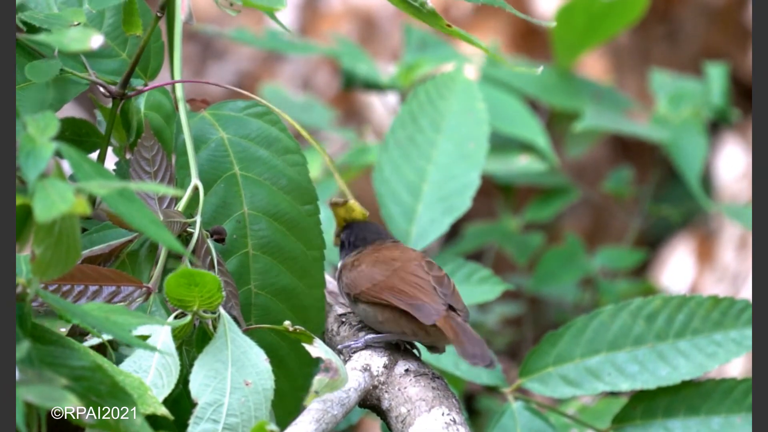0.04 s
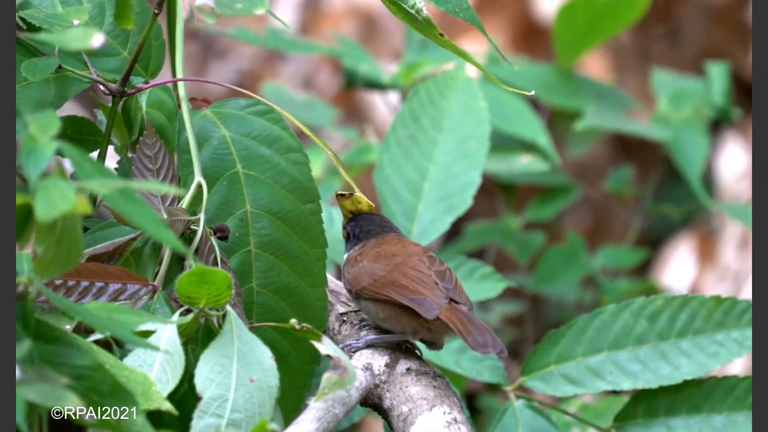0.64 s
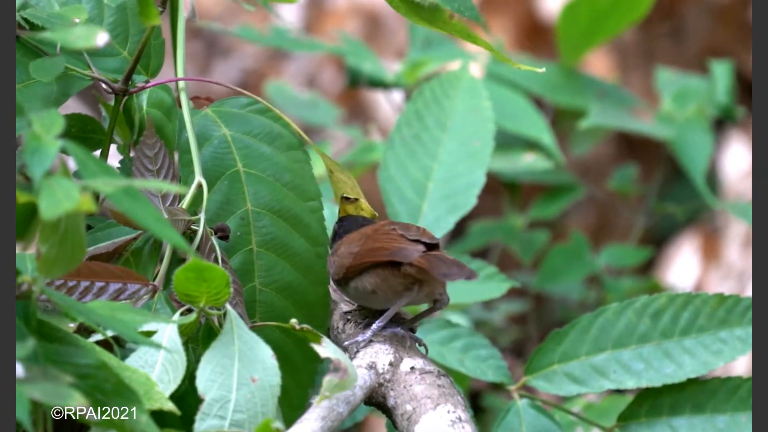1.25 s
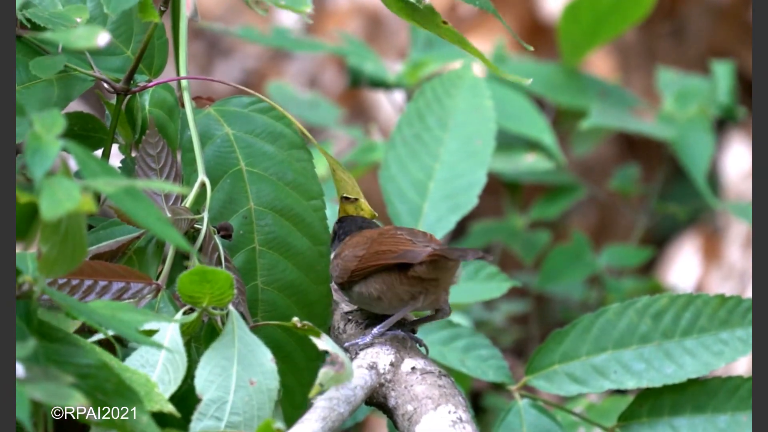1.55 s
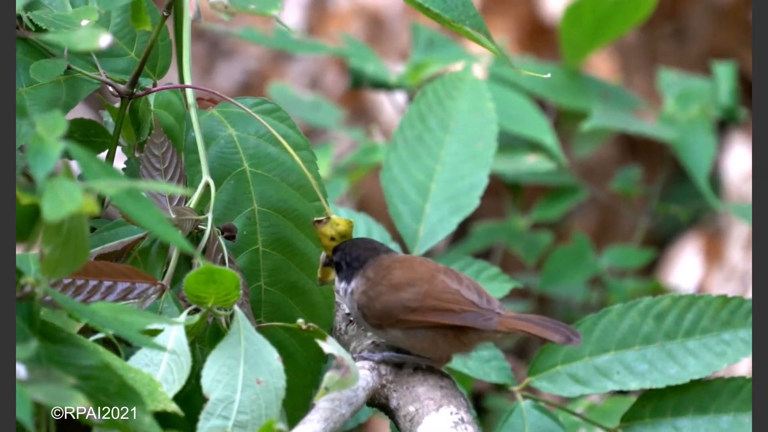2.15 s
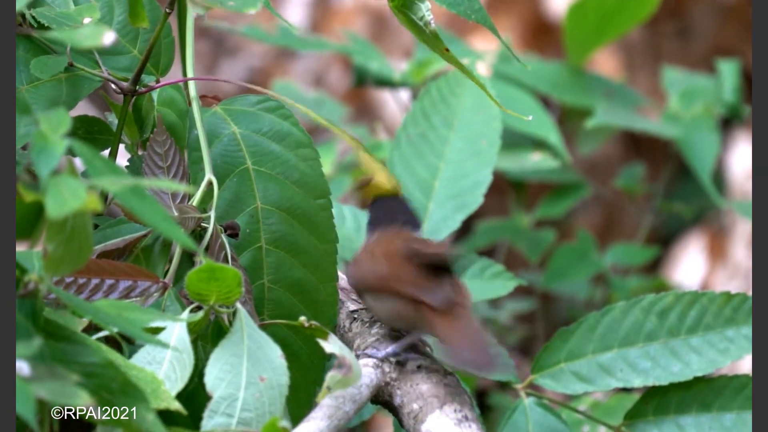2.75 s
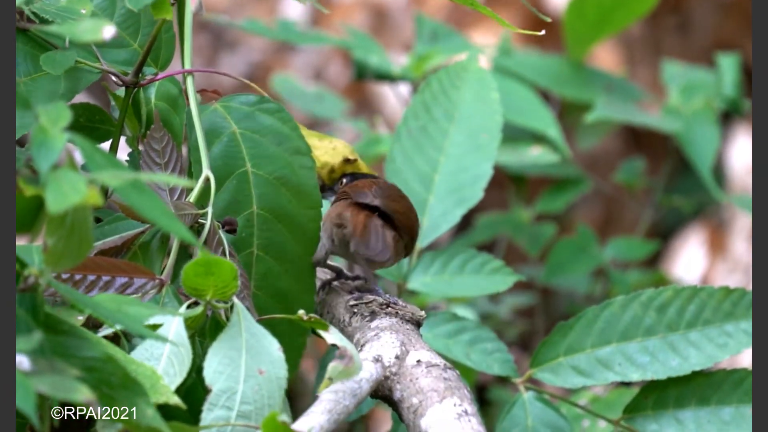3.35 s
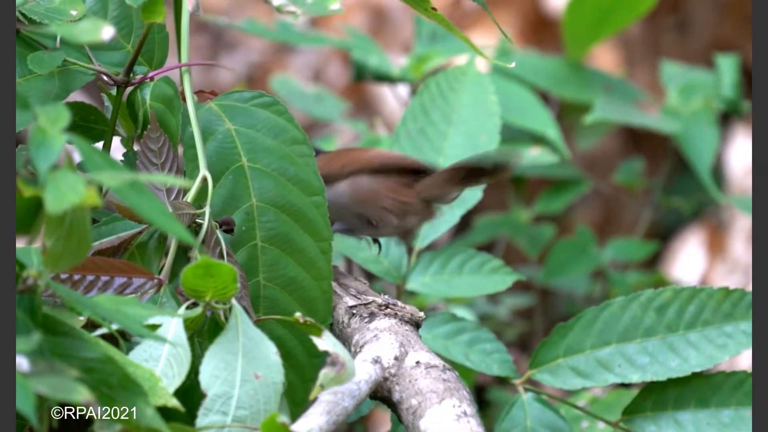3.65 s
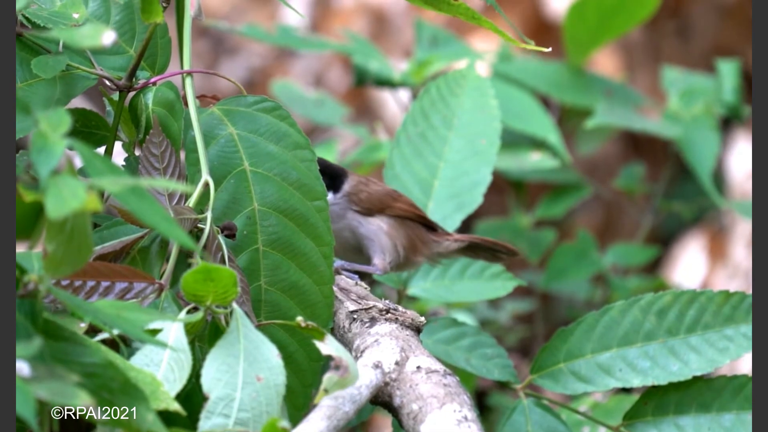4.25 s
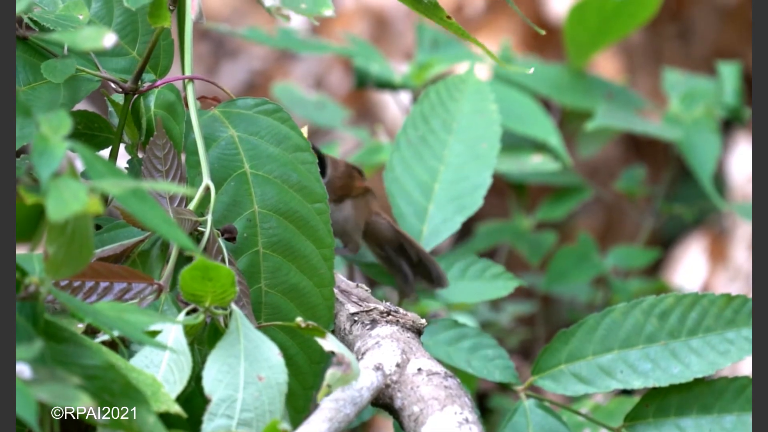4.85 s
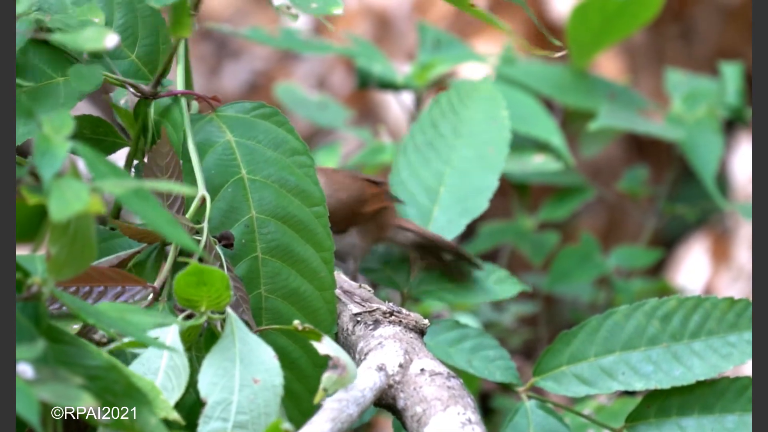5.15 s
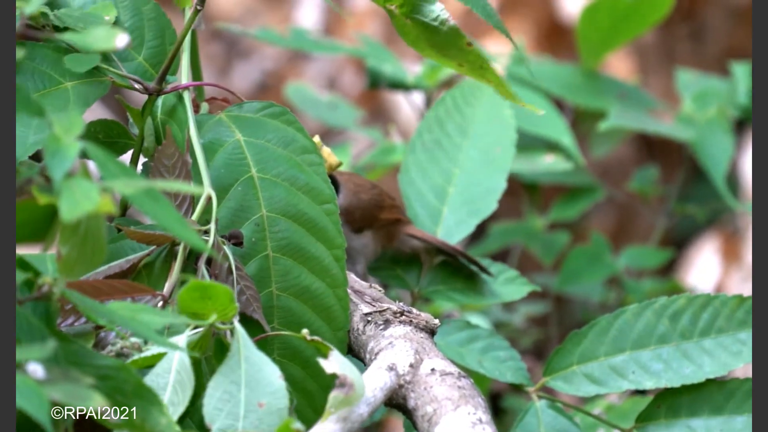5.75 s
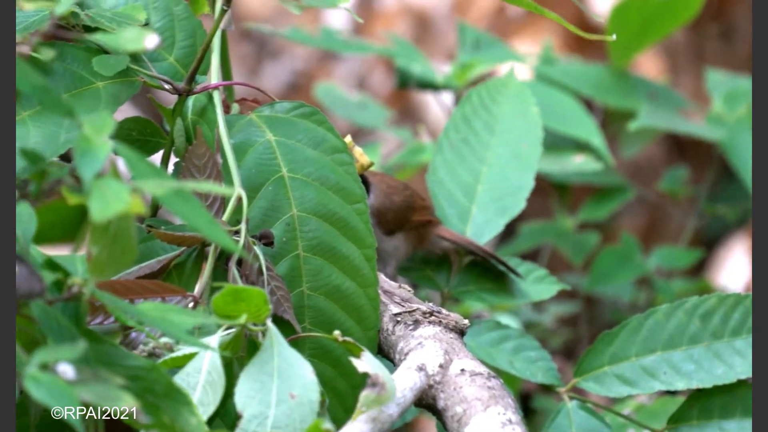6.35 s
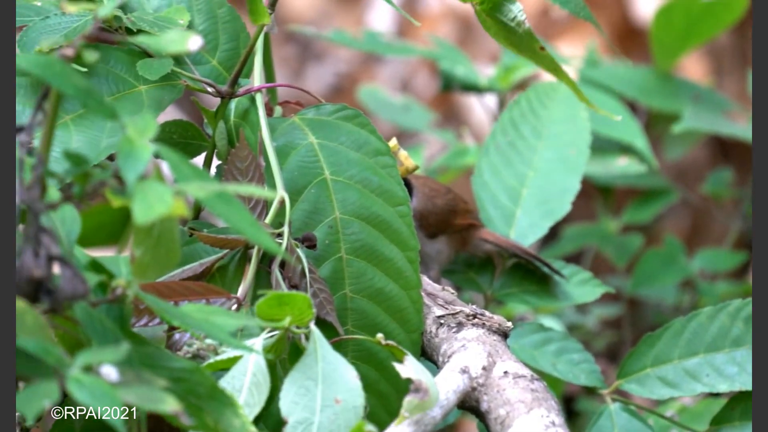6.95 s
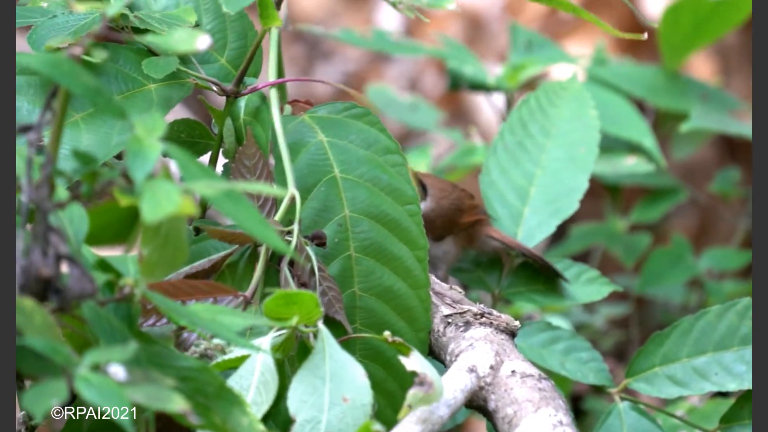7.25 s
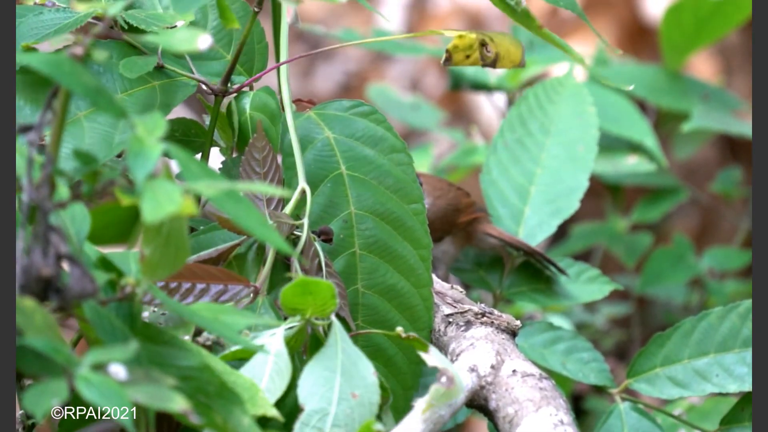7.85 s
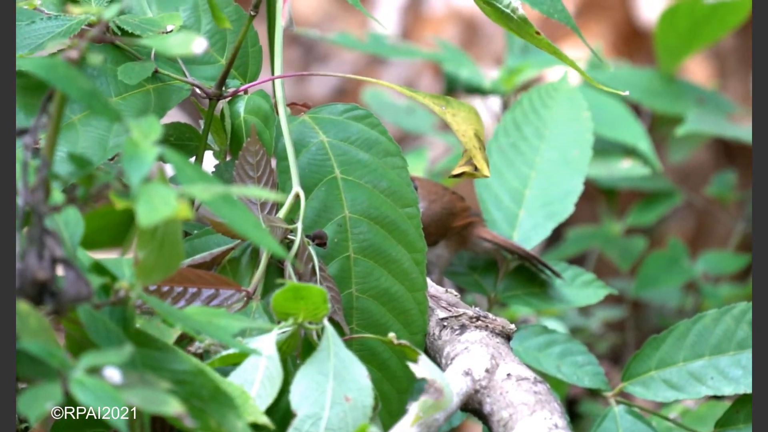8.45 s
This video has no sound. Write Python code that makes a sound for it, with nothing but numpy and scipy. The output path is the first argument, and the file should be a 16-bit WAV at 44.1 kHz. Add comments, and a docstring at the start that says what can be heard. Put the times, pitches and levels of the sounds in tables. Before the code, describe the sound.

Birds whistle sharp chips and two-note chirps among foliage, while others hoot, trill and twitter over a faint forest hush.

```python
"""Dense forest. Over a faint hush, a babbler's chirp rings out among leaves and trunks.
A farther bird starts a low warbled trill, back about every 1.4 s, and an insect ticks throughout.
Babblers whistle sharp rising chips, small birds twitter high up, and another bird gives five
hollow hoots; wings rustle now and then. From about 2 s the babblers add slower two-note chirps,
smeared like their chips by scattering in the thicket."""
import sys
import numpy as np
from scipy import signal
from scipy.fft import rfft, irfft
from scipy.io import wavfile

SR = 44100
rng = np.random.default_rng(int(sys.argv[2]) if len(sys.argv) > 2 else 0)


def unload_wav(signal):
    """Save mono or channel-first audio to the path in sys.argv[1] as 16-bit WAV at rate SR, clipped to [-1, 1]."""
    wavfile.write(
        sys.argv[1],
        SR,
        np.round(np.clip(np.atleast_2d(signal).T, -1, 1) * 32767).astype(np.int16),
    )


N = 375291


def from_db(db):
    """Decibels to gain."""
    return 10 ** (np.asarray(db) / 20)


def add(track, s, sound):
    """Mix a sound into a track at time s."""
    at = max(round(s * SR), 0)
    track[at:at + len(sound)] += sound[:max(N - at, 0)]


def times(length_s):
    """Sample times in seconds."""
    return np.arange(int(length_s * SR)) / SR


def envelope(t, attack_s, release_s):
    """Quarter-sine attack, hold, quarter-sine release."""
    attack = np.sin(np.pi / 2 * np.clip(t / attack_s, 0, 1))
    release = np.sin(np.pi / 2 * np.clip((t[-1] - t) / release_s, 0, 1))
    return attack * release


def whistle(hz, db, octave_db=-45):
    """The syrinx gives a near sine with a weak octave and soft ends."""
    phase = 2 * np.pi * np.cumsum(hz) / SR
    tone = np.sin(phase) + from_db(octave_db) * np.sin(2 * phase)
    return np.sqrt(2) * from_db(db) * signal.windows.tukey(len(hz), .1) * tone


def slur(length_s, start_hz, end_hz, db, quaver_hz=0):
    """A glide that swells and fades, with an optional quick quaver in pitch."""
    u = np.linspace(0, 1, int(length_s * SR))
    quaver = quaver_hz * np.sin(2 * np.pi * rng.uniform(50, 90) * length_s * u)
    return whistle(start_hz + (end_hz - start_hz) * u + quaver, db - 10 * (2 * u - 1) ** 2)


def echoes(x, trunks, trunk_db, leaves, leaf_db):
    """Convolve with trunk and leaf responses, each scaled by its energy."""
    response = from_db(trunk_db) * trunks / np.linalg.norm(trunks)
    response += from_db(leaf_db) * leaves / np.linalg.norm(leaves)
    return signal.fftconvolve(x, response)[:N]


def forest(x, direct, trunk_db, trunk_t60_s, leaf_db, leaf_t60_s):
    """Direct sound, separate echoes from near trunks, then a dense tail from the foliage."""
    t = times(1.3)
    trunks = rng.standard_normal(len(t)) * (rng.random(len(t)) < 900 / SR)   # 900 echoes/s
    trunks *= from_db(-60 * t / trunk_t60_s) * (t > .003)
    leaves = rng.standard_normal(len(t)) * from_db(-60 * t / leaf_t60_s) * (1 - np.exp(-t / .02))
    return direct * x + echoes(x, trunks, trunk_db, leaves, leaf_db)


# Hush spectrum: (frequency [Hz], relative density [dB])
AIR_SPECTRUM = [(22, -19), (40, -5.5), (62, 0.5), (110, 1.5), (165, -4.5), (275, 1), (420, -5.5),
                (1000, -7.5), (3200, -18), (5200, -17.5), (7500, -11), (9700, -26.5), (12500, -21.5),
                (15700, -19.5)]


def air(level_db=-71):
    """Faint, even hush of the forest."""
    hz, db = np.transpose(AIR_SPECTRUM)
    colour = from_db(np.interp(np.log(np.fft.rfftfreq(N, 1 / SR) + 1), np.log(hz), db))
    hush = irfft(rfft(rng.standard_normal(N)) * colour, N)
    return from_db(level_db) * hush / hush.std()


# Thicket decay: (band centre [Hz], T60 [s])
THICKET_DECAY = [(1700, .36), (2300, 0.3), (3000, 0.51), (4000, 0.58), (5200, 0.56), (8000, 0.77)]


def thicket(x, direct=.42, trunk_db=-6.5, trunk_t60_s=.24, leaf_db=-.5, leaf_build_s=.03):
    """The babblers' cover: trunks return separate echoes, leaves scatter high notes longest."""
    t = times(1.2)
    trunks = rng.choice([-1, 1], len(t)) * (rng.random(len(t)) < 500 / SR)   # 500 echoes/s
    trunks = trunks * from_db(-60 * t / trunk_t60_s) * (t > .004)
    white, hz = rfft(rng.standard_normal(len(t))), np.fft.rfftfreq(len(t), 1 / SR)
    centres_hz, t60s = np.transpose(THICKET_DECAY)
    leaves = np.zeros(len(t))
    for one_band, t60_s in zip(np.eye(len(centres_hz)), t60s):
        band_noise = irfft(white * np.interp(hz, centres_hz, one_band), len(t))
        leaves += band_noise * from_db(-60 * t / t60_s)
    leaves *= 1 - np.exp(-t / leaf_build_s)
    return direct * x + echoes(x, trunks, trunk_db, leaves, leaf_db)


def upsweep(length_s, top_hz, db, bend=1.8, tilt_db_per_octave=0):
    """A rough rising whistle, weak below the throat resonance and flaring as it passes through."""
    start_hz, crest_share = 1458, .92
    throat_hz, throat_width_hz = 2289, 80
    t = times(length_s)
    hz = top_hz - (top_hz - start_hz) * np.abs(1 - t / length_s / crest_share) ** bend   # 2: an arch
    octaves = np.log2(hz / throat_hz)
    throat_db = 6 * np.exp(-((hz - throat_hz) / throat_width_hz) ** 2) + 21 * np.minimum(octaves, 0)
    tilt_db = tilt_db_per_octave * np.maximum(octaves - .5, -.5)
    flutter_db = 3.5 * np.interp(t * 400, np.arange(100), rng.standard_normal(100))   # 400 points/s
    tone = whistle(hz, db + throat_db + tilt_db + flutter_db, octave_db=-35)
    return tone * envelope(t, attack_s=.013, release_s=.0096)


def second_note(low_hz, db, length_s=.035, dip_share=.2, fade_db_per_s=167.5):
    """A chirp's short closing note dips, then curls upward as it fades."""
    t = times(length_s)
    curl = np.abs((t / length_s - dip_share) / (1 - dip_share)) ** 1.4
    level_db = db + fade_db_per_s * (length_s / 2 - t)
    tone = whistle(low_hz * (1 + .27 * curl), level_db, octave_db=-41.5)
    return tone * envelope(t, attack_s=.008, release_s=.01)


# Chirp tails: (time [s], call age [s], top pitch [Hz], sweep level [dB],
# second-note pitch [Hz], second-note level [dB])
CHIRP_TAILS = [(0, 0.27, 5300, -35.5, 3590, -48), (3.243, 0.23, 4805, -32, 2886, -27.5)]


def chirp_tails(sweep_s=.064, second_delay_s=.12):
    """The ring of a chirp in the thicket, setting in abruptly without the chirp itself."""
    out = np.zeros(N)
    for s, age_s, top_hz, sweep_db, second_hz, second_db in CHIRP_TAILS:
        call = np.zeros(N)
        add(call, 0, upsweep(sweep_s, top_hz, sweep_db))
        add(call, second_delay_s, second_note(second_hz, second_db))
        ring = thicket(call)[int(age_s * SR):]
        t = np.arange(len(ring)) / SR
        add(out, s, ring * envelope(t, attack_s=.004, release_s=.004) ** 2)
    return out


# Trills: (time [s], length [s], pitch [Hz], level [dB], cut at warble crests [dB])
WARBLED_TRILLS = [(0.017, 0.22, 1085, -39.5, -2.5), (1.466, 0.23, 1082, -35.5, -1.5),
                  (2.972, 0.15, 1057, -40.5, -8.5), (3.79, 0.24, 1105, -40, 3.5),
                  (5.253, 0.23, 1094, -39.5, 8.5), (6.649, 0.23, 1101, -35.5, 13.5),
                  (8.048, .245, 1101, -32.5, 1.5)]
# Low slurs: (time [s], length [s], start pitch [Hz], end pitch [Hz], level [dB])
LOW_SLURS = [(3.122, 0.091, 1312, 1084, -47), (6.475, 0.054, 1047, 863, -56.5),
             (7.873, 0.043, 1055, 883, -59.5)]


def triller(warble_hz=24.4, warbling_s=.182, settle_s=.039, drop_s=.018, swell_db_per_s=29):
    """Trills drop in from above, warble about four times as they swell, then settle; a few slurs."""
    out = np.zeros(N)
    for s, length_s, hz, db, cut_db in WARBLED_TRILLS:
        t = times(length_s)
        warble = np.cos(2 * np.pi * warble_hz * t) * np.clip((warbling_s - t) / settle_s, 0, 1)
        swings = 1 + .2 * rng.standard_normal(8)   # warbles vary in width
        depth = .075 * np.interp(t * warble_hz, np.arange(len(swings)), swings)
        drop = .16 * np.exp(-(t / drop_s) ** 4)
        level_db = db - swell_db_per_s * np.maximum(warbling_s - t, 0) - cut_db * np.maximum(warble, 0)
        tone = whistle(hz * (1 + depth * warble + drop), level_db, octave_db=-54)
        add(out, s, tone * envelope(t, attack_s=.044, release_s=.011))
    for s, length_s, start_hz, end_hz, db in LOW_SLURS:
        add(out, s, slur(length_s, start_hz, end_hz, db))
    return forest(out, direct=.82, trunk_db=-12, trunk_t60_s=.36, leaf_db=-19.5, leaf_t60_s=.63)


def insect(ticks_per_s=11, jitter_s=.0049):
    """A loose train of tiny falling ticks."""
    out = np.zeros(N)
    for beat_s in np.arange(.03, N / SR, 1 / ticks_per_s):
        s = beat_s + rng.normal(0, jitter_s)
        add(out, s, slur(length_s=.032, start_hz=7750, end_hz=7400, db=rng.normal(-74, 2)))
    return forest(out, direct=.79, trunk_db=-8, trunk_t60_s=.24, leaf_db=-7.5, leaf_t60_s=.83)


# Chips: (time [s], length [s], top pitch [Hz], level [dB])
RISING_CHIPS = [(0.077, 0.052, 5090, -34), (0.490, 0.057, 4930, -37.5), (0.969, 0.058, 4987, -36),
                (4.743, 0.052, 5000, -27), (5.466, 0.056, 4896, -29), (5.816, 0.047, 4980, -30.5)]
# Chirp opening sweeps: (time [s], length [s], top pitch [Hz], level [dB])
CHIRP_SWEEPS = [(1.962, 0.11, 4740, -38), (4.293, 0.081, 4770, -32.5), (6.884, .07, 4820, -31.5),
                (8.36, 0.091, 4815, -34)]
# Chirp closing notes: (time [s], lowest pitch [Hz], level [dB])
CHIRP_ENDS = [(2.077, 3115, -32), (4.394, 2762, -22), (6.980, 2953, -25), (8.453, 2990, -25.5)]


def babblers(aimed_gain=.25):
    """Near-straight chips that grow as they climb; chirps of an arched sweep and a lower note."""
    sweeps, closing = np.zeros(N), np.zeros(N)
    for s, length_s, top_hz, db in RISING_CHIPS:
        add(sweeps, s, upsweep(length_s, top_hz, db, bend=1.08, tilt_db_per_octave=4))
    for s, length_s, top_hz, db in CHIRP_SWEEPS:
        add(sweeps, s, upsweep(length_s, top_hz, db))
    for s, low_hz, db in CHIRP_ENDS:
        add(closing, s, second_note(low_hz, db))
    throat_lowpass = signal.butter(14, 8700, fs=SR, output="sos")
    voice = signal.sosfilt(throat_lowpass, sweeps + closing)
    # Closing notes are aimed at the listener: more arrives unscattered.
    return thicket(voice) + aimed_gain * signal.sosfilt(throat_lowpass, closing)


# Nearest twitters: (time [s], length [s], start pitch [Hz], end pitch [Hz], level [dB])
HIGH_TWITTERS = [(0.398, 0.11, 7170, 6420, -63), (1.09, 0.074, 6970, 6840, -63),
                 (1.367, 0.03, 5316, 5320, -53), (1.543, 0.05, 4820, 4760, -61.5),
                 (1.816, 0.24, 7600, 5690, -68.5), (2.742, 0.092, 5710, 5280, -75),
                 (3.032, 0.053, 7030, 6250, -63.5), (3.241, 0.033, 7450, 6690, -52.5),
                 (3.37, 0.018, 7900, 5570, -48), (3.399, 0.081, 5950, 4670, -53.5),
                 (3.522, 0.026, 5150, 5520, -48), (3.595, 0.12, 7580, 6620, -65.5),
                 (3.645, 0.029, 5015, 5000, -57), (3.693, 0.081, 5700, 5990, -57.5),
                 (3.868, 0.079, 5840, 4553, -61), (4.073, 0.12, 5640, 7650, -57.5),
                 (4.507, .08, 5670, 6030, -51), (4.809, 0.052, 7410, 6300, -50),
                 (4.934, 0.11, 5980, 6740, -53.5), (5.094, 0.14, 5254, 5180, -51.5),
                 (5.643, 0.067, 5746, 5830, -62), (6.315, 0.085, 7140, 6380, -59.5),
                 (7.432, 0.029, 6750, 6220, -57.5), (7.571, 0.05, 5730, 4910, -67.5)]


def twitterers(quaver_hz=130, near_db=-41.5, flock_gap_s=.2):
    """Thin quavering slurs from the canopy; fainter ones are farther off and mostly echo."""
    near, scattered = np.zeros(N), np.zeros(N)
    for s, length_s, start_hz, end_hz, db in HIGH_TWITTERS:
        direct = min(from_db(.7 * (db - near_db)), .98)
        note = slur(length_s, start_hz, end_hz, db, quaver_hz * (1 - direct))
        add(near, s, direct * note)
        add(scattered, s, np.sqrt(1 - direct ** 2) * note)
    for k, (late, high, fall) in enumerate(rng.random((80, 3))):   # the flock deep in the trees
        start_hz = 7340 + 1400 * (high - .5)
        note = slur(.23, start_hz, end_hz=start_hz - 1114 * fall, db=-77.5, quaver_hz=quaver_hz)
        add(scattered, (k + late) * flock_gap_s, note)
    return near + forest(scattered, direct=0, trunk_db=-3, trunk_t60_s=.2, leaf_db=-2, leaf_t60_s=.78)


# Hoots: (time [s], level [dB])
HOLLOW_HOOTS = [(0.37, -31), (0.873, -32), (1.363, -31), (1.841, -29.5), (2.37, -32)]


def hooter(pitch_hz=749, sag_hz_per_s=60, length_s=.074):
    """Pure low hoots swell, sag a little and pass the leaves nearly unscattered."""
    out, t = np.zeros(N), times(length_s)
    hz = pitch_hz - sag_hz_per_s * (t - length_s / 2)
    for s, db in HOLLOW_HOOTS:
        add(out, s, whistle(hz, db, octave_db=-54) * envelope(t, attack_s=.048, release_s=.019))
    return forest(out, direct=.62, trunk_db=-15, trunk_t60_s=.36, leaf_db=-19, leaf_t60_s=.38)


# Feather puffs: (time [s], length [s], band centre [Hz], level [dB])
WING_RUSTLES = [(0.393, 0.045, 437, -63.5), (2.092, 0.031, 129, -74), (4.247, 0.092, 483, -64.5),
                (4.418, 0.21, 386, -71), (5.359, 0.029, 291, -61.5)]


def rustles():
    """Soft low puffs as a bird flicks its wings and shifts on the branch."""
    out = np.zeros(N)
    for s, length_s, hz, db in WING_RUSTLES:
        bandpass = signal.butter(2, [hz / 2.2, hz * 2.3], "band", fs=SR, output="sos")
        puff = signal.sosfilt(bandpass, rng.standard_normal(int(length_s * SR)))
        add(out, s, from_db(db) * puff / puff.std() * np.hanning(len(puff)))
    return out


def scene():
    """All sources in mono."""
    birds = babblers() + chirp_tails() + hooter() + triller() + twitterers()
    return (birds + insect() + rustles() + air())[None]


def record(dry):
    """Steep low-pass at 15.7 kHz."""
    return signal.sosfilt(signal.ellip(10, .1, 80, 15700, fs=SR, output="sos"), dry)


dry = scene()
out = record(dry)
unload_wav(out)
```